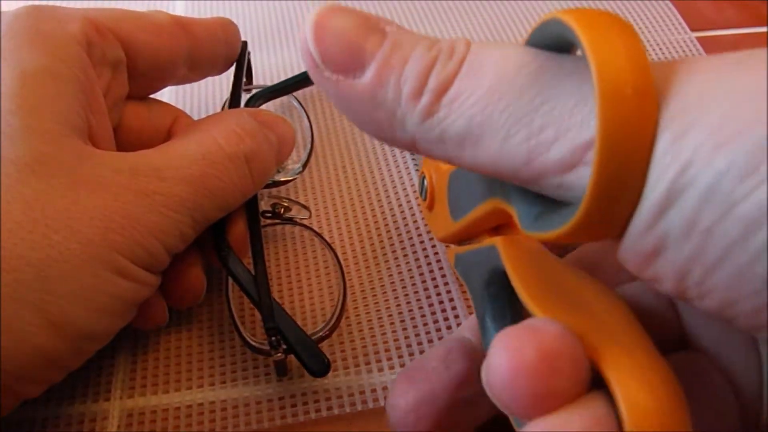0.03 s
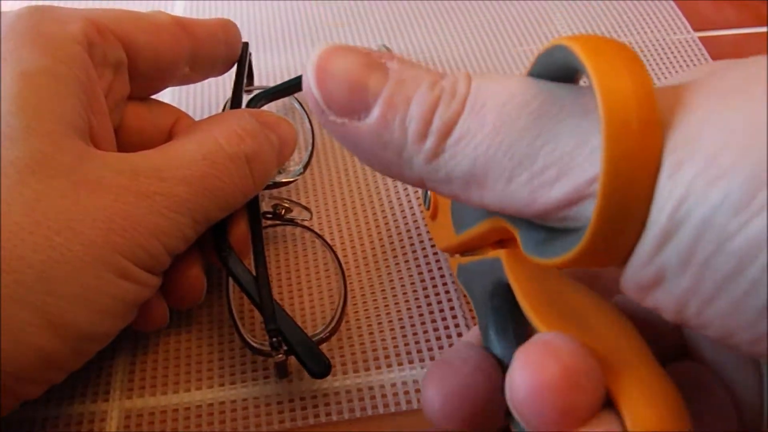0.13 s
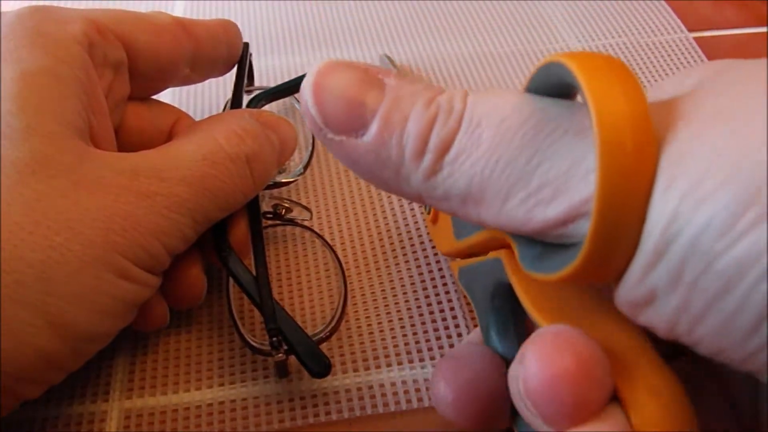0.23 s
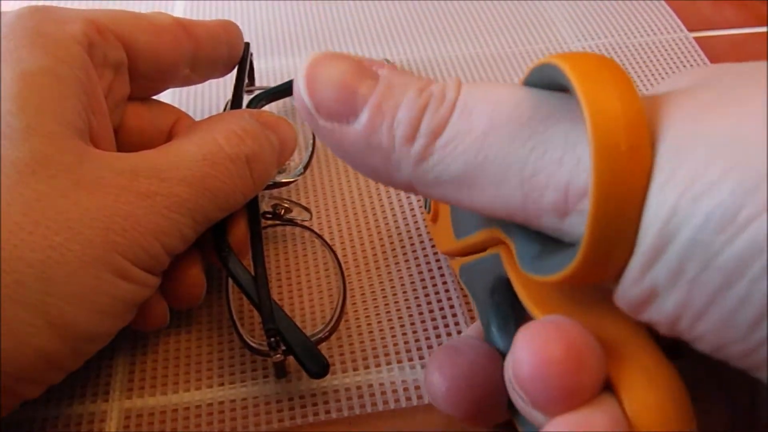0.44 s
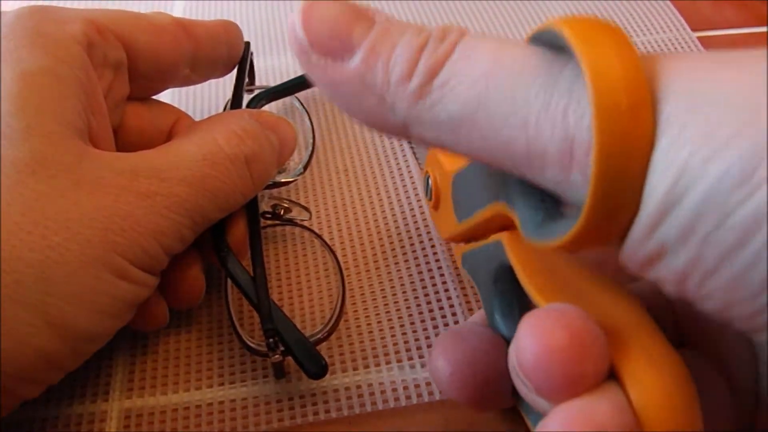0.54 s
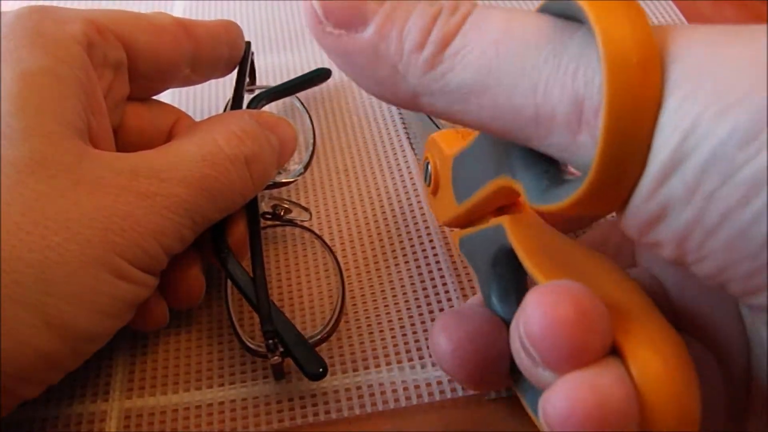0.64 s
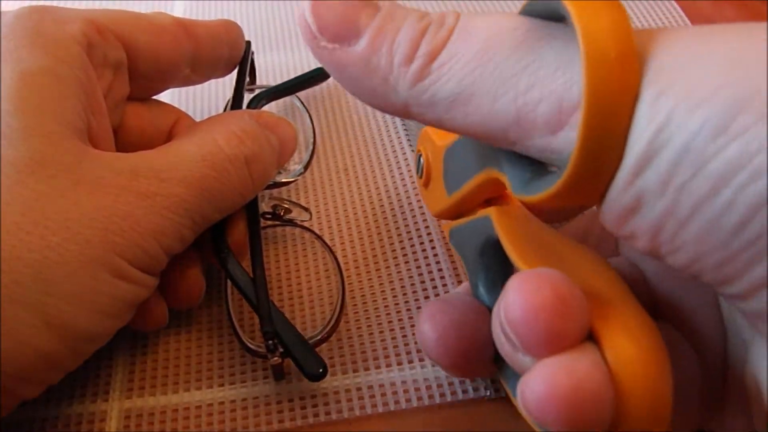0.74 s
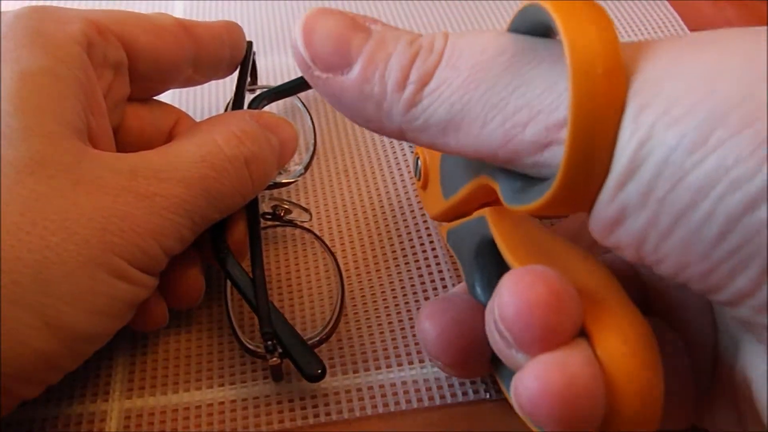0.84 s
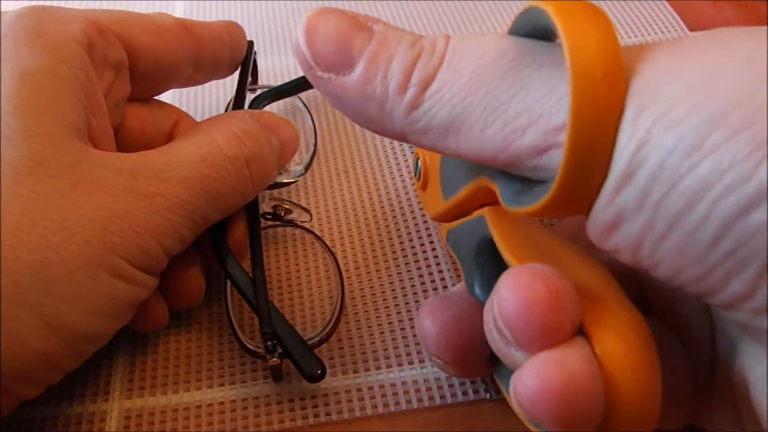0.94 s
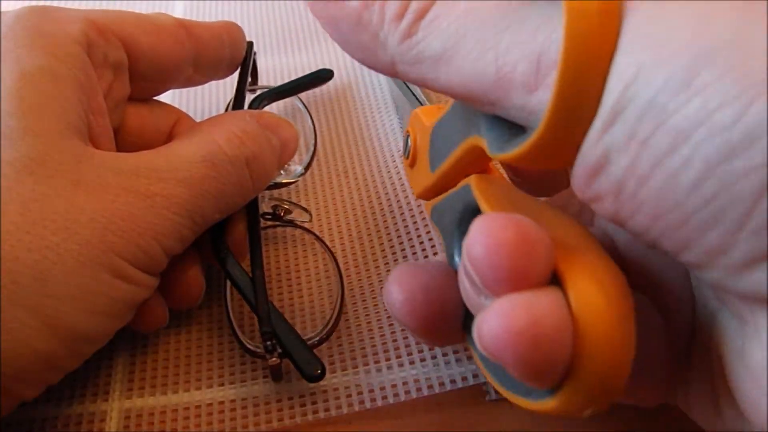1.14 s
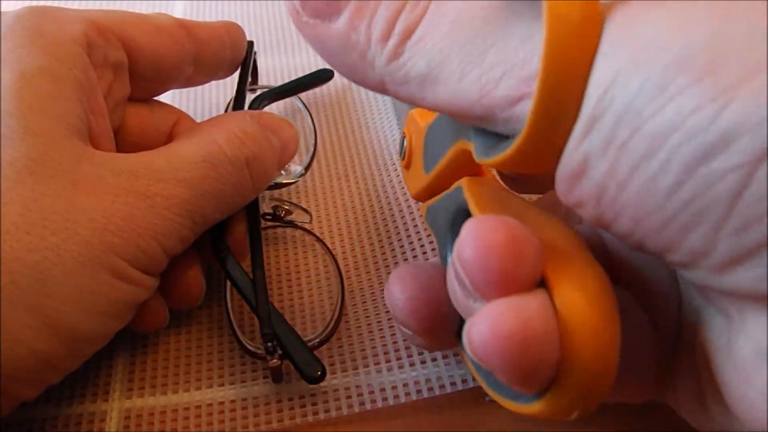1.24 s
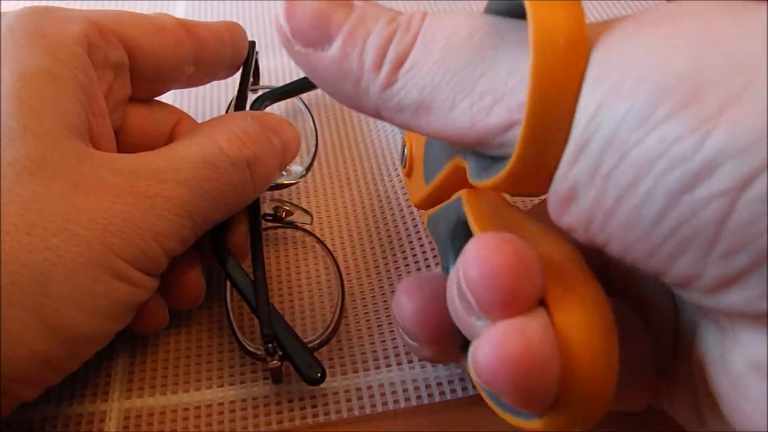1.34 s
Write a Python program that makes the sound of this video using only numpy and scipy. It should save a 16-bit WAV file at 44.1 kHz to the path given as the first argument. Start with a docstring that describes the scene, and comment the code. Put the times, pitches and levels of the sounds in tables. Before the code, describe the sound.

Scissors crunch into stiff plastic mesh and cut through with one sharp snap. The blades slide, the handles knock lightly, and a small crunch follows. The sheet rustles faintly, close to a hissy microphone in a small room.

```python
"""Scissors cut stiff plastic mesh on a craft table, close to a small hissy microphone.
The blades crunch into a rib, which parts with one sharp snap that rings in the room.
Steel slides on steel and the handles knock as the scissors reopen and move on,
then the blades bite the next rib. Hands shift the sheet throughout."""
import sys
import numpy as np
from scipy import signal
from scipy.fft import rfft, irfft, next_fast_len
from scipy.io import wavfile

SR = 44100
rng = np.random.default_rng(int(sys.argv[2]) if len(sys.argv) > 2 else 0)


def unload_wav(signal):
    """Save mono or channel-first audio to the path in sys.argv[1] as 16-bit WAV at rate SR, clipped to [-1, 1]."""
    wavfile.write(
        sys.argv[1],
        SR,
        np.round(np.clip(np.atleast_2d(signal).T, -1, 1) * 32767).astype(np.int16),
    )


N = 61739
TIME_S = np.arange(N) / SR
RING_S = TIME_S[:SR // 3]


def amp(db):
    """Decibels to gain."""
    return 10 ** (np.asarray(db) / 20)


def curve_at(curve, hz):
    """Curve value on a log-frequency axis."""
    f, value = np.transpose(curve)
    return np.interp(np.log(hz + 1), np.log(f + 1), value)


def coloured(x, spectrum):
    """x filtered by a spectrum, rms 1."""
    size = next_fast_len(len(x))
    gain = amp(curve_at(spectrum, np.fft.rfftfreq(size, 1 / SR)))
    y = irfft(rfft(x, size) * gain, size)[:len(x)]
    return y / np.sqrt(np.mean(y ** 2) + 1e-20)


def noise(spectrum, samples=N):
    """Coloured noise, rms 1."""
    return coloured(rng.standard_normal(samples), spectrum)


def swell(centre_s, sigma_s):
    """Gaussian envelope, peak 1."""
    return np.exp(-.5 * ((TIME_S - centre_s) / sigma_s) ** 2)


def add(mix, start_s, sound):
    """Mixes a sound in at start_s."""
    part = mix[round(start_s * SR):][:len(sound)]
    part += sound[:len(part)]


def decay(t60_s, t=RING_S):
    """Exponential fall, 60 dB in t60_s."""
    return np.exp(-np.log(1000) * t / t60_s)


def mode(hz, t60_s):
    """One damped vibration."""
    return np.sin(2 * np.pi * hz * RING_S) * decay(t60_s)


# Noise floor spectrum: f/Hz, level/dB
HISS_SPECTRUM = [(10, 24), (30, 22), (55, 14.5), (100, 12.5), (170, 3.5), (350, 2.5), (600, 0), (1200, -2),
                 (3000, -3), (8000, -4), (15500, -4)]


def hiss(level_db=-48.5):
    """Steady microphone hiss over a low rumble."""
    return amp(level_db) * noise(HISS_SPECTRUM)


# Sheet movements: centre t/s, sigma/s, rustle/dB, sway/dB
SHIFTS = [(0.056, 0.043, -50.5, -55), (0.217, .025, -56.5, -49), (0.266, 0.019, -54.5, -42),
          (0.332, 0.051, -63, -41), (0.532, 0.044, -56, -44.5), (0.641, 0.025, -45, -47),
          (0.843, .03, -52, -52), (1.1, .05, -56.5, -58.5), (1.395, 0.017, -50, -49)]
# Sheet rustle spectrum: f/Hz, level/dB
RUSTLE_SPECTRUM = [(30, -28), (130, -2), (250, 0.5), (420, -1), (700, -15.5), (2000, -24.5), (6000, -49),
                   (16000, -56)]
# Sheet sway spectrum: f/Hz, level/dB
SWAY_SPECTRUM = [(10, 0), (25, 1.5), (50, -11.5), (100, -16), (180, -33), (600, -63), (16000, -100)]


def sheet_shifts():
    """Hands shift the sheet on the table: a dull rustle and a deep sway."""
    rustle = sum(amp(db) * swell(t, sigma) for t, sigma, db, _ in SHIFTS)
    sway = sum(amp(db) * swell(t, sigma) for t, sigma, _, db in SHIFTS)
    return rustle * noise(RUSTLE_SPECTRUM) + sway * noise(SWAY_SPECTRUM)


def sheet_push(peak_s=.0012, ring_db=-6.5):
    """A shove on the sheet: one pulse and a brief ring."""
    u = RING_S / peak_s
    return -u * np.exp(1 - u) - amp(ring_db) * mode(hz=347.6, t60_s=.042)


# Blade bites: centre t/s, sigma/s, cracks/dB, ring f/Hz, ring/dB, push/dB
BITES = [(0.2055, .0011, -43, 5600, -46, -32), (0.2083, 0.00067, -30.5, 5350, -33, -41.5),
         (0.2133, 0.00206, -41, 5600, -52, -37), (.219, 0.001, -31, 10100, -44, -49),
         (0.2339, 0.0011, -34.5, 8920, -50, -29.5), (0.2392, 0.0014, -44, 5500, -47, -45),
         (.2436, .001, -35.5, 11360, -31.5, -29.5), (0.263, .0004, -50, 8800, -52, -59),
         (.2828, 0.00071, -30.5, 11100, -40, -28.5), (1.3769, 0.0007, -33.5, 8600, -41, -36.5),
         (1.380, 0.00093, -39, 11100, -34, -40), (1.3823, 0.00048, -38, 3910, -33, -38),
         (1.3831, 0.0003, -39, 10930, -26, -61)]
# Tearing plastic spectrum: f/Hz, level/dB
CRUNCH_SPECTRUM = [(200, -10), (1000, -15.5), (2600, -10), (4000, -10.5), (5300, 2.5), (7200, -4),
                   (9500, 1), (11200, 0), (13000, -6), (16000, -14)]


def bites(cracks_per_s=7000, ring_t60_s=.0063):
    """Each bite is a clump of tiny cracks that rings the plastic, plus a shove on the sheet."""
    clicks = rng.choice([-1., 1.], N) * (rng.random(N) < cracks_per_s / SR)
    cracks = coloured(clicks, CRUNCH_SPECTRUM)
    out = np.zeros(N)
    for centre_s, sigma_s, cracks_db, ring_hz, ring_db, push_db in BITES:
        clump = swell(centre_s, sigma_s)
        ring = signal.oaconvolve(clump * clicks, mode(ring_hz, ring_t60_s))[:N]
        ring *= np.linalg.norm(clump) / (np.linalg.norm(ring) + 1e-12)
        out += amp(cracks_db) * clump * cracks + amp(ring_db) * ring
        add(out, centre_s - sigma_s, amp(push_db) * sheet_push())
    return out


# Room decay times: f/Hz, T60/s
ROOM_T60 = [(200, 0.35), (1000, .2), (4000, 0.19), (8000, 0.23), (15000, 0.14)]


def room_tail(spectrum):
    """Diffuse tail of a small room, each band dying at its own rate; energy 1."""
    hz, t, bands = signal.stft(noise(spectrum, len(RING_S)), SR, nperseg=256)
    bands = bands * decay(curve_at(ROOM_T60, hz)[:, None], t)
    tail = signal.istft(bands, SR, nperseg=256)[1]
    return tail / np.linalg.norm(tail)


# Room tail spectrum: f/Hz, level/dB
ROOM_SPECTRUM = [(100, 7.5), (1500, 1.5), (2800, 7), (5000, 8), (6800, -3), (9000, -4), (15000, 7.5)]
# Echoes off near surfaces: delay/s, level/dB
ECHOES = [(.0075, -27.5), (.0089, -20), (.0102, -23.5), (.0122, -27.5), (.0165, -49)]
TAIL_DELAY_S = .006


def room(x, tail_db):
    """Direct sound, near echoes and diffuse tail."""
    response = np.zeros(SR // 2)
    add(response, TAIL_DELAY_S, amp(tail_db) * room_tail(ROOM_SPECTRUM))
    for delay_s, db in ECHOES:
        add(response, delay_s, amp([db]))
    return x + signal.fftconvolve(x, response)[:N]


# Rib crack spectrum: f/Hz, level/dB
CRACK_SPECTRUM = [(100, -32), (400, -1.5), (1200, -8), (2200, -15), (3000, 0), (4000, 5.5), (5000, -6),
                  (6200, 1), (8500, -6), (11000, -1), (13000, -5), (16000, -13)]
# Blade modes: f/Hz, level/dB, T60/s
BLADE_MODES = [(2974, -23, 0.021), (3110, -26.5, 0.017), (3830, -22.5, 0.0098), (5800, -12.5, 0.006),
               (6880, -11.5, 0.0076), (8354, 3, 0.0029), (9124, -0.5, 0.0041), (9670, -22, .0035)]
SNAP_S = .2855


def snap(crack_db=9, ring_db=2, push_db=-26, rise_s=.00032):
    """The rib cracks, the blades spring together and ring, and the sheet is shoved."""
    hz = np.fft.rfftfreq(N, 1 / SR)
    lag_s, spread_s, knee_hz = .0002996, .0007, 2974
    # Treble runs ahead through the steel.
    arrival_s = SNAP_S + lag_s + spread_s * np.sqrt(knee_hz / np.maximum(hz, knee_hz))
    phase_rad = -2 * np.pi * (np.cumsum(arrival_s) - arrival_s[0]) * hz[1]
    crack = irfft(amp(curve_at(CRACK_SPECTRUM, hz)) * np.exp(1j * phase_rad), N)
    out = amp(crack_db) * crack / np.linalg.norm(crack)
    ring = sum(amp(db) * mode(f, t60) for f, db, t60 in BLADE_MODES)
    ring *= np.minimum(RING_S / rise_s, 1)
    add(out, SNAP_S, amp(ring_db) * ring + amp(push_db) * sheet_push())
    return out


# Snap reverberation spectrum: f/Hz, level/dB
SNAP_REVERB_SPECTRUM = [(100, -4), (400, 0), (1000, -14), (2000, -11.5), (2900, 5), (4000, 0), (5000, 0),
                        (6600, 5.5), (9000, -0.5), (11000, -3), (15500, -4.5)]


def snap_reverb(level_db=-3):
    """The snap radiates all round and fills the room."""
    out = np.zeros(N)
    add(out, SNAP_S + TAIL_DELAY_S, amp(level_db) * room_tail(SNAP_REVERB_SPECTRUM))
    return out


# Blade slides: centre t/s, sigma/s, level/dB
SLIDES = [(0.536, 0.0099, -49), (1.394, 0.011, -53.5)]
# Steel friction spectrum: f/Hz, level/dB
STEEL_SPECTRUM = [(300, -16), (2500, -7), (5000, -3.5), (8000, 3), (11000, 0), (16000, -14)]


def blade_slides():
    """Steel rubs on steel in short, bright swells."""
    envelope = sum(amp(db) * swell(t, sigma) for t, sigma, db in SLIDES)
    return envelope * noise(STEEL_SPECTRUM)


# Handle knocks: t/s, body/dB, tick/dB, rolloff/(dB/octave), struck spot f/Hz, spot/dB
KNOCKS = [(0.6074, -33, -22, -0.5, 1600, -31), (0.81, -51.5, -77, 7.5, 215, -46),
          (0.8246, -53.5, -70, 8.5, 330, -43), (0.839, -51, -53, -2, 1680, -47),
          (0.8526, -46.5, -34, -2, 1674, -38), (0.858, -58, -70, 6, 338, -37.5),
          (1.231, -46, -60, 0.5, 474, -36)]
# Handle modes: f/Hz, level/dB, T60/s
HANDLE_MODES = [(163, -10.5, 0.12), (290, -12, 0.05), (323.3, -0.5, 0.092), (440.4, -5.5, 0.12),
                (474.6, -7, 0.12), (894, -12.5, .06), (1064, -11, 0.084), (1250, -3.5, 0.059),
                (1746, -11, 0.057), (2140, -21, 0.044), (2466, 0.5, .026), (3456, -15.5, 0.056),
                (4480, -13, 0.085)]
# Pivot tick spectrum: f/Hz, level/dB
TICK_SPECTRUM = [(300, -4), (800, -15), (1600, 4), (2600, 6), (3800, -15), (6000, -4), (8000, 2),
                 (11000, -3.5), (16000, -16)]


def handle_knocks(rolloff_ref_hz=719):
    """The pivot ticks, the handles and the struck spot ring; soft knocks are duller."""
    out = np.zeros(N)
    for start_s, body_db, tick_db, rolloff, spot_hz, spot_db in KNOCKS:
        body = np.zeros(len(RING_S))
        for hz, db, t60_s in HANDLE_MODES:
            tilted_db = db - rolloff * np.log2(hz / rolloff_ref_hz)
            body += rng.choice([-1, 1]) * amp(tilted_db) * mode(hz, t60_s)
        tick = noise(TICK_SPECTRUM, len(RING_S)) * decay(t60_s=.0056)
        spot = mode(spot_hz, t60_s=.028)
        add(out, start_s, amp(body_db) * body + amp(tick_db) * tick + amp(spot_db) * spot)
    return out


def scene():
    """Cutting and knocking in the room, over handling noise and hiss; mono."""
    cutting = room(bites() + snap(), tail_db=-25.5) + snap_reverb()
    knocking = room(handle_knocks(), tail_db=-14.5)
    return (cutting + knocking + blade_slides() + sheet_shifts() + hiss())[None]


def record(dry):
    """Hard limit at full scale, just reached by the snap; then a low-pass."""
    cutoff_hz = 15900
    lowpass = signal.firwin(511, cutoff_hz, window=("kaiser", 9), fs=SR)
    return signal.oaconvolve(np.clip(dry, -1, 1), lowpass[None], "same")


dry = scene()
out = record(dry)
unload_wav(out)
```